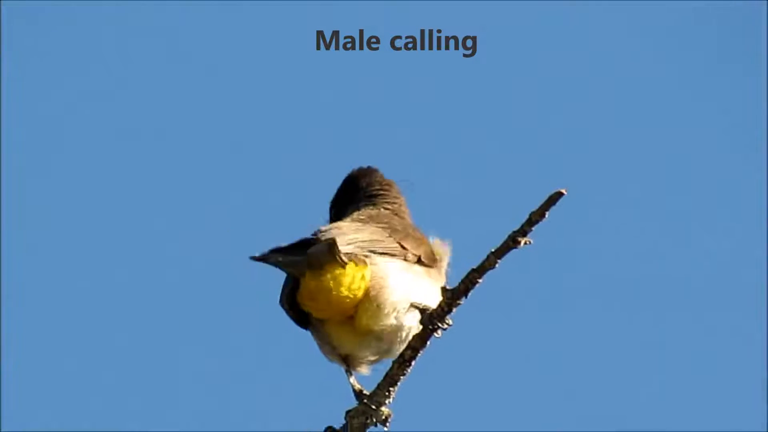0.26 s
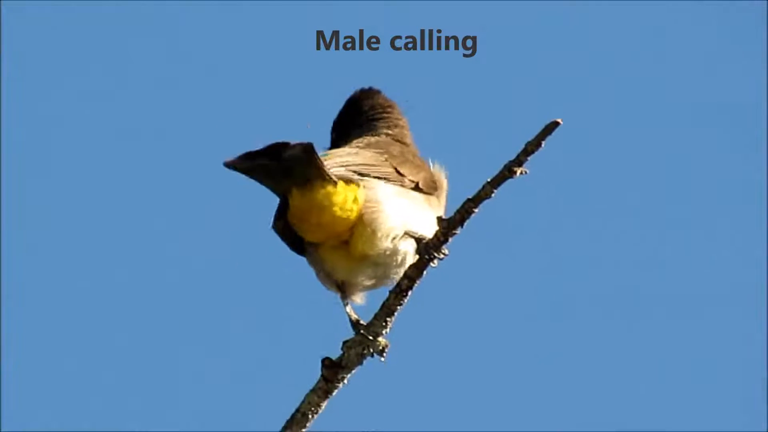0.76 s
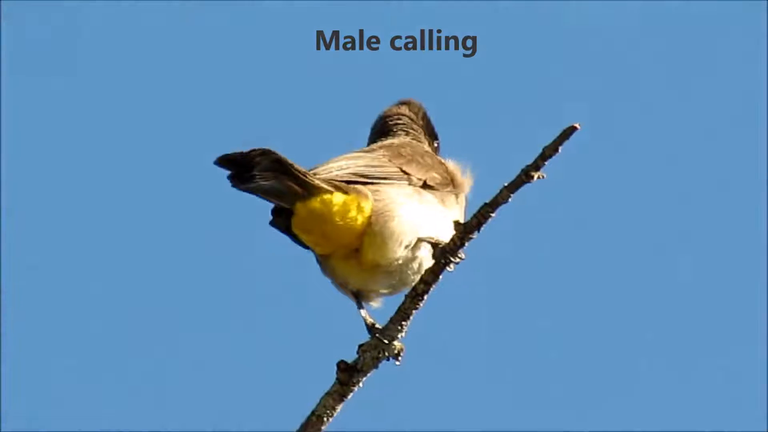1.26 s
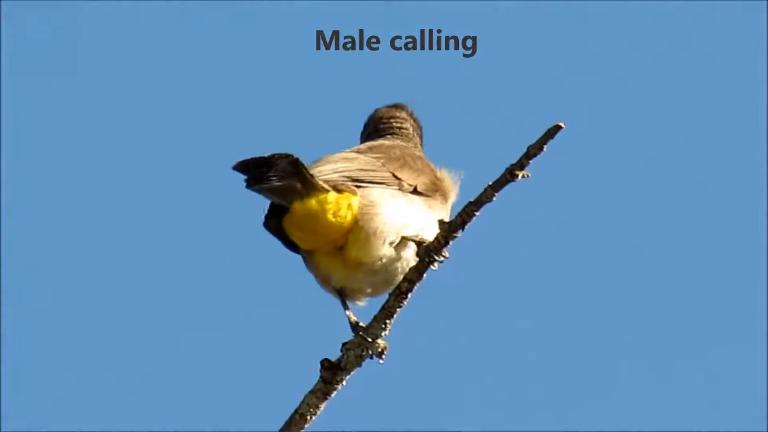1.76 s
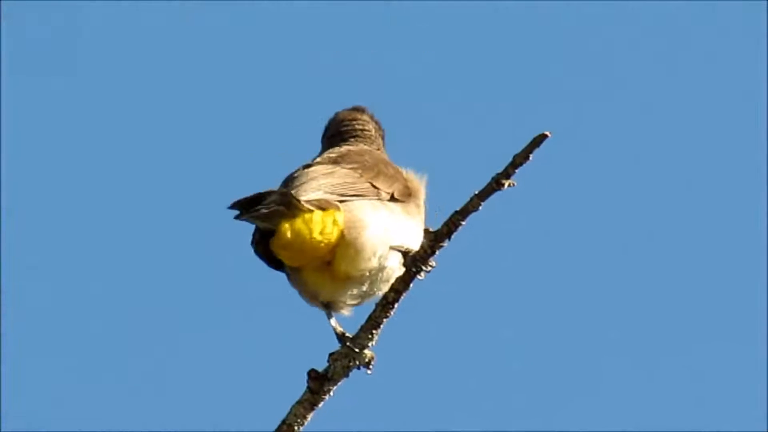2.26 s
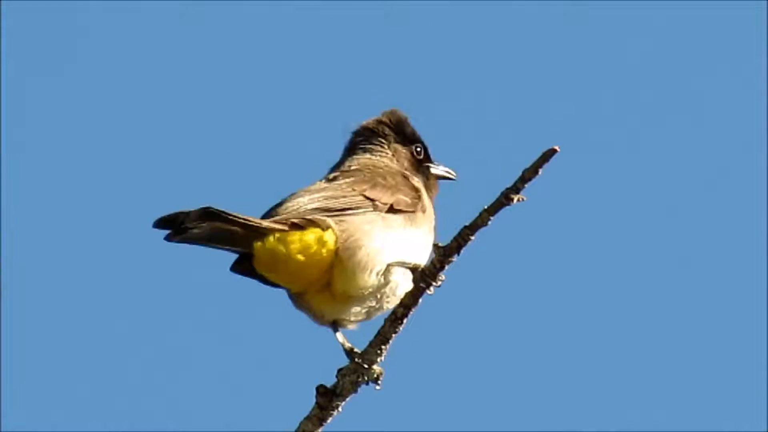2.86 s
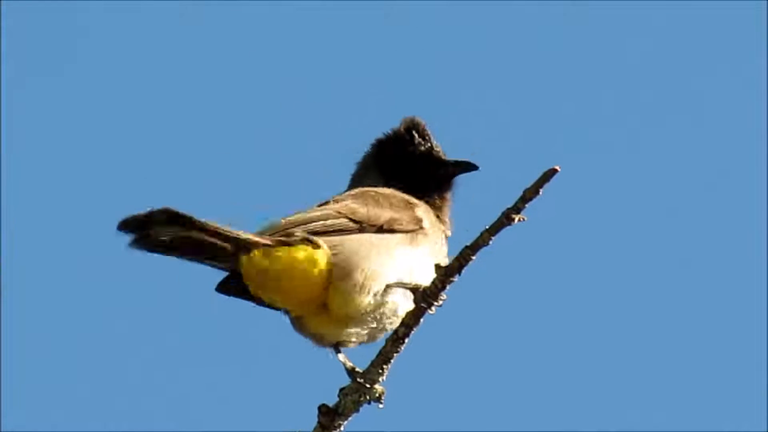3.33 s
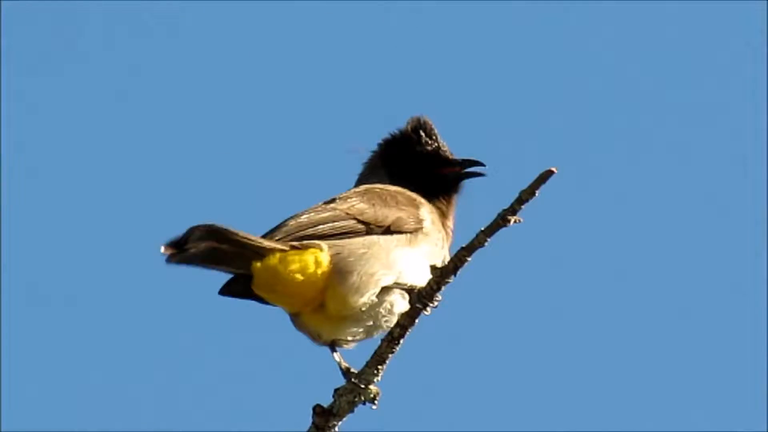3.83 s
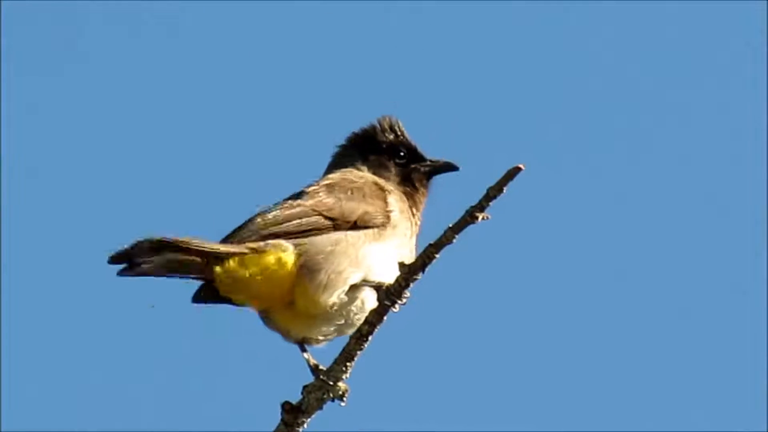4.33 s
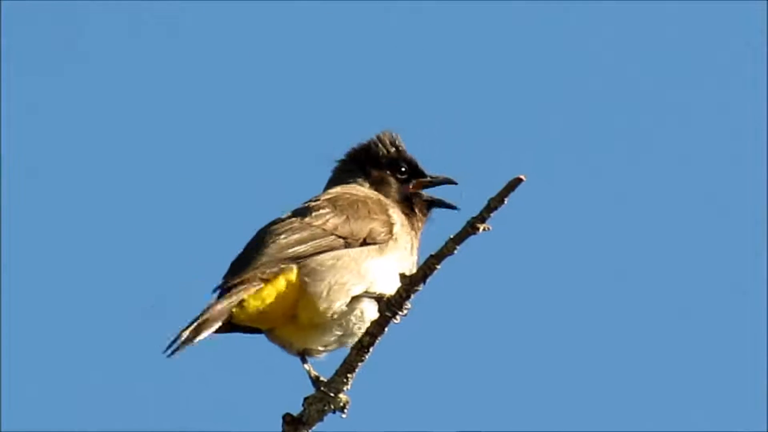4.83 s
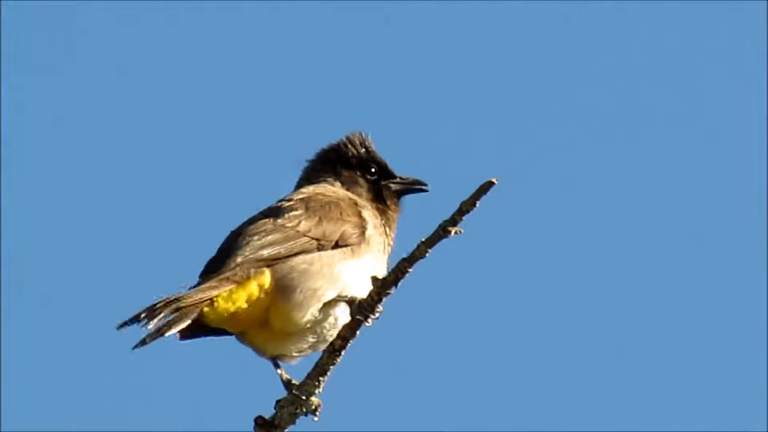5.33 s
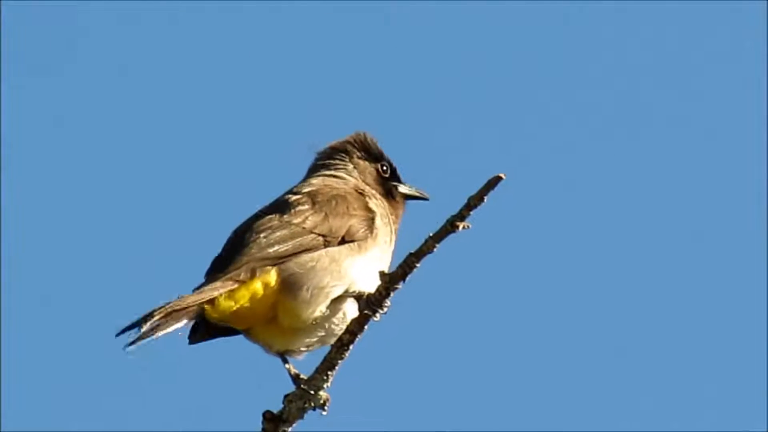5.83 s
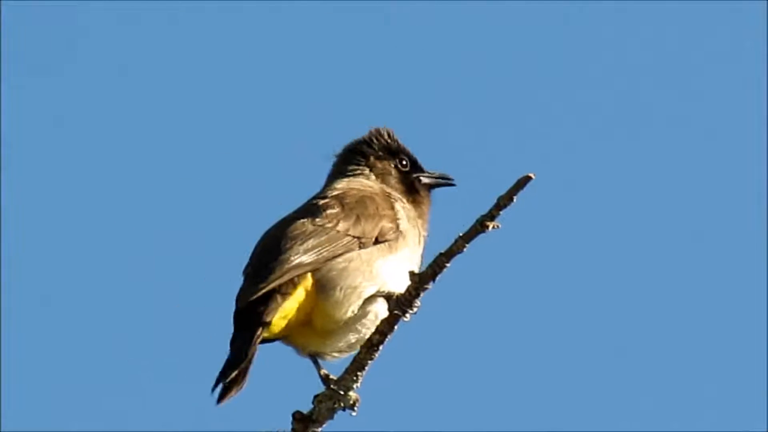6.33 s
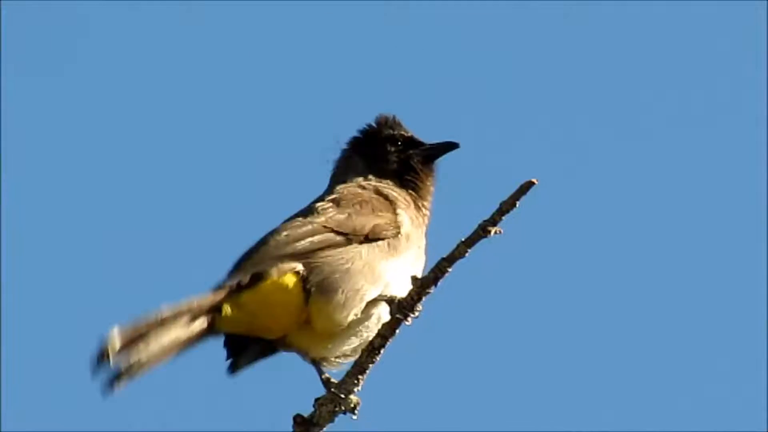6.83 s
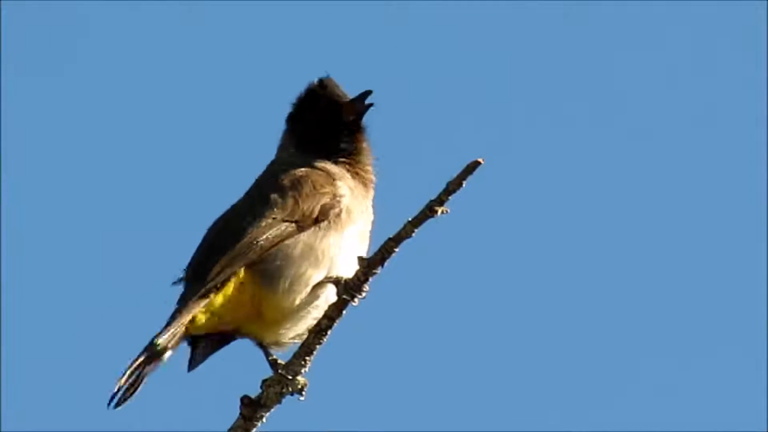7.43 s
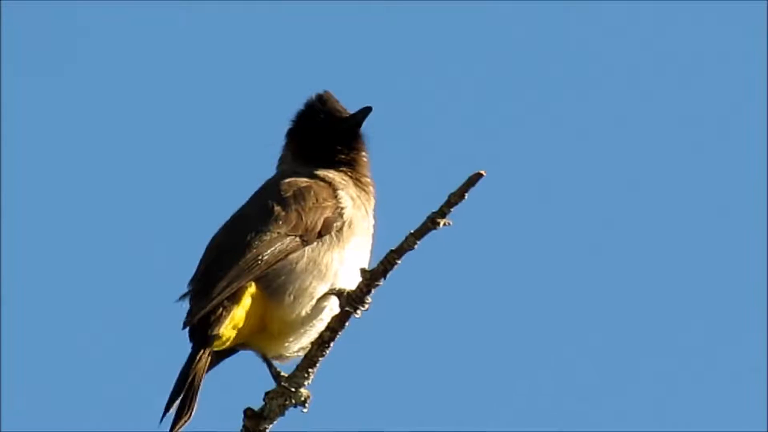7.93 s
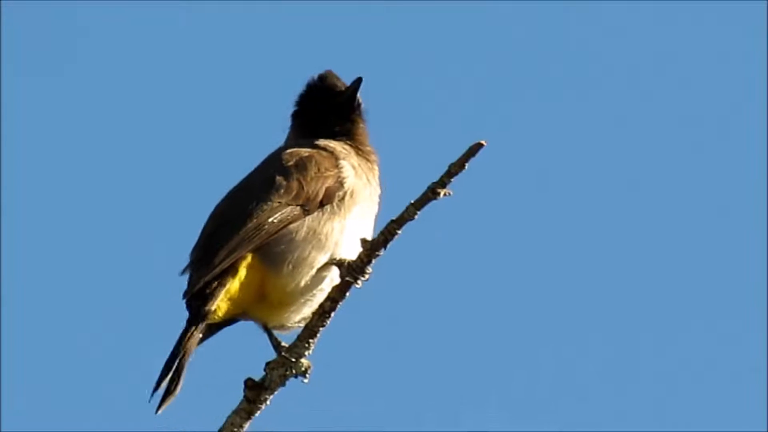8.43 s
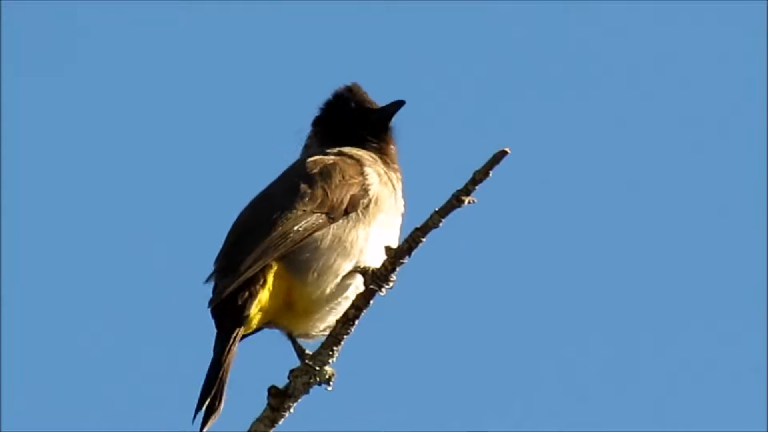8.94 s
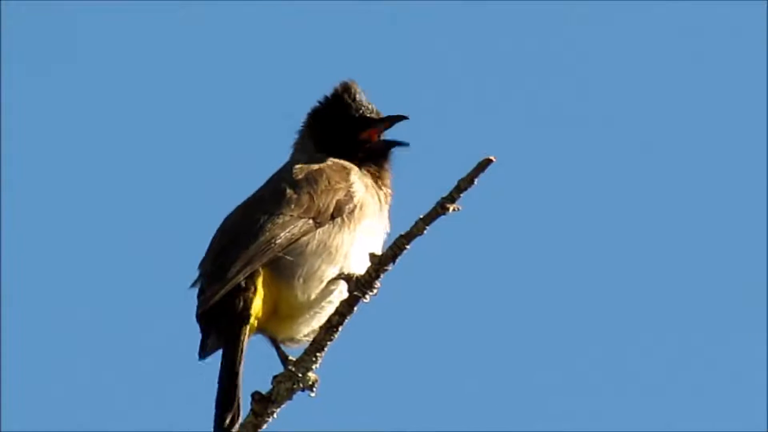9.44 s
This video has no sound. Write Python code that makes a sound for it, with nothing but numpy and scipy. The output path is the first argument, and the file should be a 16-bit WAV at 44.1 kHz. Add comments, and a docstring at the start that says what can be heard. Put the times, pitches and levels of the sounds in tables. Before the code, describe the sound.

A bulbul on a twig calls close and centred: five evenly spaced bright, raspy chirps, then a quick bubbling phrase, more spaced chirps, and two further bubbling runs with pauses. A second small bird adds thin, high squeaky whistles to the left. Echoes from ground and foliage trail each note over a very soft rush of open air.

```python
"""A bright, partly rough chirp comes first, repeats, and breaks three times into a bubbling phrase.
The bird, a bulbul, is a near-sine syrinx with unsteady pitch, half-step tones and beak-shaped overtones.
To the left a second small bird whistles thin frequency glides; fainter glides come from far off.
Discrete echoes and a scattered tail return every note from the ground and trees.
Shaped noise makes a quiet rush of distant air, and damped resonances make a few soft bumps."""
import sys
import numpy as np
from scipy import signal
from scipy.fft import rfft, irfft
from scipy.io import wavfile
from scipy.ndimage import uniform_filter1d

SR = 44100
rng = np.random.default_rng(int(sys.argv[2]) if len(sys.argv) > 2 else 0)


def unload_wav(signal):
    """Save mono or channel-first audio to the path in sys.argv[1] as 16-bit WAV at rate SR, clipped to [-1, 1]."""
    wavfile.write(
        sys.argv[1],
        SR,
        np.round(np.clip(np.atleast_2d(signal).T, -1, 1) * 32767).astype(np.int16),
    )


N = 427329

# All levels in the tables are relative; each source is scaled again where it is mixed.
# Song notes by kind: mark_s, pitch_hz, level_db, overtones_db, top_sheen_db, left_minus_right_db
CHIRP_NOTES = [(-0.012,3117,-20.5,-35,-15,-0.5), (0.274,3198,-23.5,-29,-19,1),
               (0.54,3110,-22.5,-34,-11,-0.5), (0.832,3083,-23,-33.5,-15,-0.5),
               (1.102,3017,-22.5,-32,-11,0), (2.424,3013,-24,-31,-17,-1), (3.24,2963,-27.5,-30,-5,-0.5),
               (3.626,3190,-23.5,-23.5,-10,0), (3.964,3167,-25,-22.5,-12,1), (4.261,3071,-24.5,-22.5,-7,0),
               (4.541,2957,-25,-26,-7,0), (4.921,3142,-25.5,-20,-16,0), (5.184,2924,-28.5,-20,-9,0.5),
               (5.477,2947,-27,-23,-11,0), (5.773,3152,-24.5,-22.5,-9,0.5), (6.094,3100,-25.5,-23,-15,0.5),
               (7.026,2993,-24.5,-24,-7,0.5), (9.52,3096,-25.5,-21.5,-9,-1)]
PIP_NOTES = [(1.412, 2320, -30.5, -37, 1, 0.5), (2.726, 2340, -27.5, -41, -8, -1.7),
             (7.326, 2370, -30.5, -28.5, -2, 0.18)]
RASP_NOTES = [(1.619, 2525, -30, -40, 0.15, -1.5), (2.833, 2603, -30, -34.5, 2, -0.5),
              (7.489, 2560, -30, -28, 2, -1.5)]
FALL_NOTES = [(7.607, 2276, -31, -37.5, 18, -1.72)]
# Slurred notes: the same six columns, then rise_s
SLUR_NOTES = [(2.046, 2572, -34.5, -43, -5.7, -1.3, 0.05), (6.34, 2623, -35, -32, -5.2, -0.41, 0.05),
              (6.723, 2564, -37, -25.5, -9, -0.63, 0.052), (8.206, 2560, -35, -29.5, 1.6, -1.3, 0.047),
              (8.739, 2603, -34, -31, -4.8, -0.5, .072), (9.2, 2697, -34, -28, -7.4, -0.77, .062)]
# Glides of the small bird: start_s, length_s, first_hz, last_hz, level_db
SMALL_BIRD_GLIDES = [(.389, .023, 4700, 5860, -42.5), (.39, .018, 6300, 7130, -49),
                     (.408, 0.047, 4190, 3920, -40), (0.452, .042, 3850, 5840, -37),
                     (.552, .028, 3900, 4670, -32.5), (.58, 0.022, 4700, 5500, -42),
                     (4.866, .035, 4200, 5390, -41), (4.922, .036, 4050, 5350, -33),
                     (5.057, 0.027, 3550, 5230, -36.5), (5.077, 0.032, 4980, 7100, -48),
                     (5.122, 0.013, 6830, 4870, -49), (5.144, 0.027, 4950, 4370, -35.5),
                     (5.164, 0.14, 4480, 5330, -36.5), (5.284, .023, 5170, 7000, -41.5),
                     (9.278, .037, 4770, 5380, -40), (9.325, .043, 3840, 5260, -31.5),
                     (9.366, .026, 6200, 3430, -35), (9.422, .033, 3350, 3620, -38),
                     (9.456, .008, 3900, 6470, -35.5), (9.46, .04, 6500, 7300, -47),
                     (9.537, .055, 4500, 5060, -36.5), (9.619, 0.032, 5100, 5660, -35.5)]
# Faint glides from far off: start_s, length_s, first_hz, last_hz, level_db
FAR_GLIDES = [(0.727, 0.056, 5940, 6070, -57.5), (1.33, 0.13, 4920, 4200, -65),
              (1.734, 0.066, 5900, 4900, -59), (1.982, 0.055, 5940, 5530, -59),
              (2.96, 0.033, 4220, 3940, -59), (3.073, 0.082, 4860, 4430, -58),
              (6.485, 0.058, 2690, 3700, -48), (6.493, 0.16, 5660, 5120, -59.5),
              (8.039, 0.025, 1763, 1690, -59), (8.651, 0.029, 1760, 1670, -54.5),
              (8.979, .03, 1760, 1700, -56)]
# Soft damped bumps: start_s, pitch_hz, level_db, t60_s
SOFT_BUMPS = [(1.025, 135, -38, .1), (1.045, 628, -39, 0.06), (1.588, 640, -43.5, 0.2),
              (1.88, 530, -35, 0.043)]
# Radiation of overtones from the beak: frequency_hz, gain_db
BEAK_RADIATION = [(3600, 21.5), (4800, 5.5), (6300, 2), (7800, -4.5), (9700, -2), (11000, -8.5),
                  (12800, -4), (15000, -7.5)]
# Where an open beak adds its sheen: frequency_hz, share_0_to_1
BEAK_SHEEN = [(9500, 0.045), (10800, 0.93)]
# Throat filter, holding back what lies above the song's range: frequency_hz, gain_db
THROAT_FILTER = [(1200, 1), (3350, -0.5), (3600, -5), (3900, -6.5), (5000, -2.5)]
# Reflections from ground and trunks: delay_s, level_db
GROUND_ECHOES = [(.003, -8), (.0075, -3.5), (0.013, -20.5), (0.025, -9), (0.042, -13.5), (0.054, -9)]
# Reflection and decay among leaves: frequency_hz, gain_db, t60_s
FOLIAGE_RESPONSE = [(1130, -4, 0.68), (1820, 1, 0.53), (2240, 0.5, 0.49), (2830, 3, 0.54), (5200, 2, 0.33),
                    (6560, -3.5, 0.58), (9300, -4, 0.15), (15000, -15, 0.12)]
# Spectrum of the distant air: frequency_hz, density_db_per_hz
AIR_SPECTRUM = [(15, -42), (25, -0.5), (71, 1), (106, -2), (214, -3.5), (295, -5), (533, -9), (593, -9.5),
                (987, -11.5), (1160, -14), (1690, -14), (1980, -14.5), (3480, -16), (3780, -15),
                (15200, -33.5)]
# Likeness of the air in the two channels: frequency_hz, correlation_-1_to_1
AIR_CORRELATION = [(30, -0.76), (70, -0.76), (140, -0.39), (280, -0.32), (600, -0.038), (1500, 0.044),
                   (5000, 0.12), (14000, -0.31)]
EDGE_HZ = 15400  # upper band limit
CLEAR_DROP_DB = 16.5  # how much weaker the half-step tones are in a clear voice than in a rough one


def amp(db):
    """Decibels to amplitude gain."""
    return 10 ** (np.asarray(db) / 20)


def evened(x):
    """Normalises to a root-mean-square of one."""
    return x / np.sqrt(np.mean(x ** 2) + 1e-20)


def read(points, hz, axis=1):
    """Interpolates one column of a spectrum on a log-frequency axis."""
    columns = np.transpose(points)
    return np.interp(np.log(hz + 1), np.log(columns[0] + 1), columns[axis])


def add(mix, s, sound):
    """Superposition: adds a sound into the mix at time s."""
    start = round(s * SR)
    sound = sound[..., max(-start, 0):]
    part = mix[..., max(start, 0):][..., :sound.shape[-1]]
    part += sound[..., :part.shape[-1]]


def wobble(count, rate_hz):
    """Low-passed noise: smooth chance movement, normalised to about rms one."""
    hz = np.fft.rfftfreq(8192 + count, 1 / SR)
    spectrum = rfft(rng.standard_normal(8192 + count)) / (1 + (hz / rate_hz) ** 4)
    return evened(irfft(spectrum))[:count]


def air(level_db=-47, patchy_db=1.0, ease_db_per_s=0.11):
    """Shaped noise with partial stereo coherence: a distant rush that drifts in patches and slowly eases."""
    frames, hz = N // 256 + 5, np.fft.rfftfreq(1024, 1 / SR)
    a, b, c, d, patches = rng.standard_normal((5, frames, len(hz)))
    patches = uniform_filter1d(patches, size=20, axis=0)  # over time
    patches = evened(uniform_filter1d(patches, size=14, axis=1))  # over frequency
    same = read(AIR_CORRELATION, hz)
    left = a + 1j * b
    right = same * left + np.sqrt(1 - same ** 2) * (c + 1j * d)
    z = np.array([left, right]) * amp(read(AIR_SPECTRUM, hz) + patchy_db * patches)
    rush = signal.istft(z.transpose(0, 2, 1), nperseg=1024, noverlap=768)[1][:, :N]
    easing = amp(-ease_db_per_s * np.arange(N) / SR)
    return amp(level_db) * evened(rush * easing)


def outdoors(x, echo_db, scatter_db, likeness=0.3, build_s=0.013):
    """Convolution with an impulse response: direct sound, discrete echoes and a foliage-scattered tail."""
    t = np.arange(SR) / SR
    taps = rng.standard_normal((2, SR))
    taps[1] = likeness * taps[0] + np.sqrt(1 - likeness ** 2) * taps[1]
    # each band decays with its own t60
    hz, s, z = signal.stft(taps, SR, nperseg=256)
    decay = amp(-60 * s / read(FOLIAGE_RESPONSE, hz, axis=2)[:, None])
    tail = signal.istft(z * decay, SR, nperseg=256)[1][:, :SR]
    tail *= 1 - np.exp(-t / build_s)
    paths = amp(scatter_db) * tail / np.linalg.norm(tail[0]) / np.sqrt(2)
    for delay_s, db in GROUND_ECHOES:
        for channel in paths:
            # slightly unlike delays at the two channels give each echo a side
            add(channel, delay_s + rng.uniform(0, .00025), amp([db + echo_db]))
    # leaves swallow the treble of all that is reflected
    leaves = amp(read(FOLIAGE_RESPONSE, np.fft.rfftfreq(SR, 1 / SR)))
    paths = irfft(rfft(paths) * leaves)
    paths[:, 0] += 1  # direct sound
    return signal.fftconvolve(np.atleast_2d(x), paths, axes=1)[:, :N]


def far_birds(waver=.03):
    """Frequency-modulated sines under smooth windows: short soft glides."""
    out = np.zeros(N)
    for s, length_s, first_hz, last_hz, level_db in FAR_GLIDES:
        count = round(length_s * SR)
        hz = np.linspace(first_hz, last_hz, count) * (1 + waver * wobble(count, 300))
        tone = np.sin(2 * np.pi * np.cumsum(hz) / SR)
        add(out, s, amp(level_db) * tone * np.hanning(count))
    return out


def bumps(blur=1.0):
    """Damped resonance: dull knocks that decay exponentially, their phase blurred by noise."""
    out, t = np.zeros(N), np.arange(SR // 5) / SR
    for s, hz, level_db, t60_s in SOFT_BUMPS:
        ring = np.sin(2 * np.pi * hz * t + blur * wobble(len(t), 243))
        onset = 1 - np.exp(-t / 0.0018)
        add(out, s, amp(level_db - 60 * t / t60_s) * onset * ring)
    return out


def small_bird(waver=0.01, glide_waver=0.043, fast_hz_per_s=40000, bend=.85, taper=0.27):
    """Frequency glides that flatten as they go, purer when slow and rougher when fast."""
    out = np.zeros(N)
    for s, length_s, first_hz, last_hz, level_db in SMALL_BIRD_GLIDES:
        count = round(length_s * SR)
        hz = first_hz + (last_hz - first_hz) * np.linspace(0, 1, count) ** bend
        speed_hz_per_s = abs(last_hz - first_hz) / length_s
        rough = waver + glide_waver * np.tanh(speed_hz_per_s / fast_hz_per_s)
        phase = 2 * np.pi * np.cumsum(hz * (1 + rough * wobble(count, 560))) / SR
        add(out, s, amp(level_db) * np.sin(phase) * signal.windows.tukey(count, taper))
    return out


def envelope(t, attack_s, attack_db, release_s, release_db, curve=1.282):
    """Effort contour in dB: climbs by attack_db, holds at zero, then sinks by release_db."""
    rising = np.maximum(1 - (t - t[0]) / attack_s, 0)
    sinking = np.maximum(1 - (t[-1] - t) / release_s, 0)
    return -attack_db * rising ** curve - release_db * sinking ** curve


def switch(t, at_s, over_s, before, after):
    """Sigmoid transition from one value to another."""
    return before + (after - before) * (1 + np.tanh((t - at_s) / over_s)) / 2


def crest(t, top_s, top_hz, rise_hz_per_s, sag_hz_per_s):
    """Piecewise-linear pitch contour that climbs to a top and sags from it."""
    return top_hz - rise_hz_per_s * np.maximum(top_s - t, 0) - sag_hz_per_s * np.maximum(t - top_s, 0)


# A gesture returns: time from the note's mark (s), pitch contour (Hz, transposed later to each note),
# effort (dB), roughness (0-1), and the level of the half-step tones when fully rough (dB).
def chirp(stroke_s=.0158, count=2, hold_s=.037, start_hz=2050, reach_hz=3080, leap_hz=190,
          sag_hz_per_s=11500, peak_db=2, break_db=7, split_db=-17):
    """Repeated frequency sweeps: rough upstrokes grow, then leap to a clearer tone that sags as it dies."""
    t = np.arange(-count * stroke_s, hold_s, 1 / SR)
    stroke = np.where(t < 0, t / stroke_s % 1, 1)  # how far each upsweep has come
    held_hz = crest(t, top_s=.005, top_hz=reach_hz + leap_hz, rise_hz_per_s=28600, sag_hz_per_s=sag_hz_per_s)
    hz = np.where(t < 0, start_hz + (reach_hz - start_hz) * stroke, held_hz)
    effort_db = peak_db + envelope(t, attack_s=0.0458, attack_db=13, release_s=0.023, release_db=14.5)
    effort_db -= break_db * (1 - stroke) ** 2  # weak at the start of each stroke
    straining = switch(t, at_s=-.021, over_s=0.0029, before=.48, after=0.76)
    rough = switch(t, at_s=.001, over_s=0.0033, before=straining, after=0.23)
    return t, hz, effort_db, rough, split_db


def pip(lead_s=.008, hold_s=0.032, peak_db=6.0, rough=0.2, split_db=-22):
    """Brief upward frequency sweep: a clear flick that sags a little and fades at once."""
    t = np.arange(-lead_s, hold_s, 1 / SR)
    hz = crest(t, top_s=0.0041, top_hz=2450, rise_hz_per_s=66000, sag_hz_per_s=9400)
    effort_db = peak_db + envelope(t, attack_s=.012, attack_db=25.5, release_s=0.025, release_db=18.5)
    return t, hz, effort_db, rough, split_db


def rasp(lead_s=.018, second_s=.033, hold_s=.057, hum_hz=2020, hum_db=-13, hum_rough=0.11, peak_db=1,
         fade_db_per_s=210, snap_db=6, snap_s=0.0021, split_db=-13):
    """Impulsive effort: a soft low tone snaps into two harsh strokes, mostly rising and then falling."""
    t = np.arange(-lead_s, hold_s, 1 / SR)
    age = np.where(t < second_s, abs(t), t - second_s)  # time since the stroke began
    hz = crest(t, top_s=.027, top_hz=2870, rise_hz_per_s=13650, sag_hz_per_s=25900)
    effort_db = peak_db + snap_db * np.exp(-age / snap_s) - fade_db_per_s * age
    effort_db = np.where(t < 0, hum_db, effort_db)
    effort_db = effort_db - switch(t, at_s=hold_s, over_s=0.0061, before=0, after=15.6)
    rough = switch(age, at_s=0.017, over_s=0.013, before=0.66, after=0.23)
    return t, np.where(t < 0, hum_hz, hz), effort_db, np.where(t < 0, hum_rough, rough), split_db


def fall(lead_s=0.0028, hold_s=.155, slide_s=.074, top_hz=2920, rest_hz=1885, split_db=-23):
    """Decelerating downward sweep: a loud slide that settles on a quiet, clear whistle."""
    t = np.arange(-lead_s, hold_s, 1 / SR)
    hz = rest_hz + (top_hz - rest_hz) * np.maximum(1 - (t + lead_s) / slide_s, 0) ** 2
    effort_db = switch(t, at_s=.036, over_s=0.0117, before=6.7, after=-4)
    effort_db += envelope(t, attack_s=.01, attack_db=34.5, release_s=.028, release_db=16)
    return t, hz, effort_db, switch(t, at_s=0.057, over_s=.02, before=0.16, after=0.11), split_db


def slur(rise_s, tumble_s=.021, start_hz=1780, top_hz=2980, bend=.7, tumble_hz_per_s=48000,
         peak_db=1.3, crack_db=2.5, split_db=-6):
    """Register break: a slow rise flattens and clears as it grows, then cracks and tumbles."""
    t = np.arange(0, rise_s + tumble_s, 1 / SR)
    hz = start_hz + (top_hz - start_hz) * np.minimum(t / rise_s, 1) ** bend
    hz -= tumble_hz_per_s * np.maximum(t - rise_s, 0)
    effort_db = peak_db + envelope(t, attack_s=0.01994, attack_db=16.5, release_s=0.00708, release_db=12.5)
    effort_db += switch(t, rise_s, over_s=0.0063, before=0, after=crack_db)
    effort_db -= crack_db * np.exp(-((t - rise_s) / 0.0083) ** 2)  # dip at the crack
    clearing = switch(t, at_s=0.0084, over_s=0.01, before=0.73, after=.3)
    rough = switch(t, rise_s, over_s=0.0065, before=clearing, after=0.74)
    return t, hz, effort_db, rough, split_db


def note(row, gesture, jitter_hz=500, shimmer=0.57, rasp_db=-2, brightening=1.11,
         smear=1.6, smear_hz=450, grit=0.17, grit_hz=1500):
    """Subharmonic voicing: a near-sine syrinx that, when rough, shakes and gains tones at half steps."""
    s, pitch_hz, level_db, treble_db, sheen_db, pan_db = row
    t, *controls = gesture
    count = len(t)
    glide_hz, effort_db, rough, split_db = (uniform_filter1d(c * np.ones(count), size=60) for c in controls)
    rough = np.clip(rough, 0, 1)
    # the gesture is transposed so that its loud part centres on the note's pitch
    hz = glide_hz * pitch_hz / np.average(glide_hz, weights=amp(effort_db) ** 2)
    hz *= 1 + .008 * wobble(count, 90) + .08 * rough * wobble(count, jitter_hz)
    phase = 2 * np.pi * np.cumsum(hz) / SR
    flutter = (1 + shimmer * rough * wobble(count, jitter_hz)) * signal.windows.tukey(count, .06)

    tone = np.sin(phase + grit * rough * wobble(count, grit_hz))
    half_steps = 0.49 * np.sin(phase / 2) + 1.06 * np.sin(3 * phase / 2)
    tone += amp(split_db - CLEAR_DROP_DB * (1 - rough)) * half_steps
    throat = amp(read(THROAT_FILTER, np.fft.rfftfreq(count, 1 / SR)))
    tone = irfft(rfft(amp(effort_db) * flutter * tone) * throat, count)

    overtones = np.zeros(count)
    for k in np.arange(4, 17) / 2:  # multiples 2 to 8 of the pitch, in half steps
        share = amp(rasp_db) * rough if k % 1 else 1
        beak = amp(read(BEAK_RADIATION, k * hz) + sheen_db * read(BEAK_SHEEN, k * hz))
        beak = beak * (k * hz < EDGE_HZ)
        # no two cycles close alike, which blurs the overtones
        blur = smear * np.sqrt(rough) * wobble(count, smear_hz)
        overtones += share * beak * np.sin(k * phase + 2 * np.pi * rng.random() + blur)
    # brightening: dB of overtones per dB of effort; above one they grow faster than the tone
    sound = tone + amp(treble_db + brightening * effort_db) * flutter * overtones
    sides_db = [[level_db + pan_db / 2], [level_db - pan_db / 2]]
    return s + t[0], amp(sides_db) * sound


def bulbul():
    """Gestural control of the syrinx: each kind of note has one gesture, with its own pitch and strength."""
    out = np.zeros((2, N))
    for rows, gesture in ((CHIRP_NOTES, chirp()), (PIP_NOTES, pip()), (RASP_NOTES, rasp())):
        for row in rows:
            add(out, *note(row, gesture))
    for *row, rise_s in SLUR_NOTES:
        add(out, *note(row, slur(rise_s)))
    for row in FALL_NOTES:  # the falling whistle stays bright as it quietens
        add(out, *note(row, fall(), brightening=0.82))
    return out


def scene():
    """Superposition of sources: air, far birds, bumps, the small bird to the left and the bulbul ahead."""
    far = outdoors(far_birds(), echo_db=-4, scatter_db=-1.5) * amp(6.0)
    knocks = bumps() * amp([[1.1], [-1.1]])  # left, right
    left = outdoors(small_bird(), echo_db=-3.5, scatter_db=-2.5) * amp([[0.5], [-7]])
    near = outdoors(bulbul(), echo_db=-0.5, scatter_db=-3.0) * amp(1.5)
    return air() + far + knocks + left + near


def record(dry):
    """Linear-phase low-pass filtering: a steep band limit at EDGE_HZ."""
    low_pass = signal.firwin(511, EDGE_HZ, window=("kaiser", 9), fs=SR)
    return signal.oaconvolve(dry, low_pass[None], "same")


dry = scene()
out = record(dry)
unload_wav(out)
```